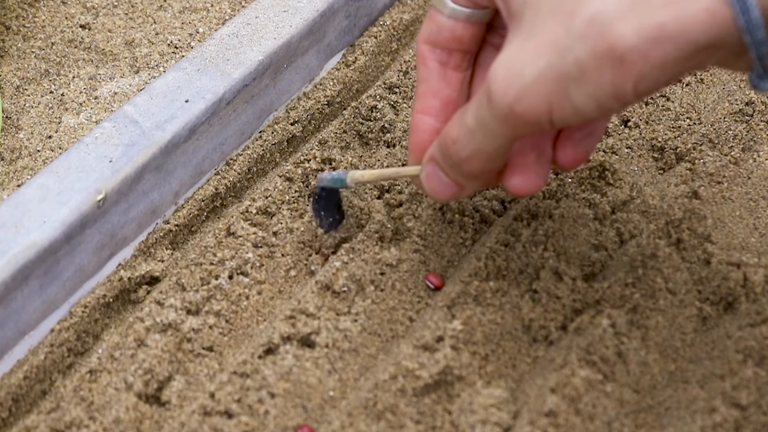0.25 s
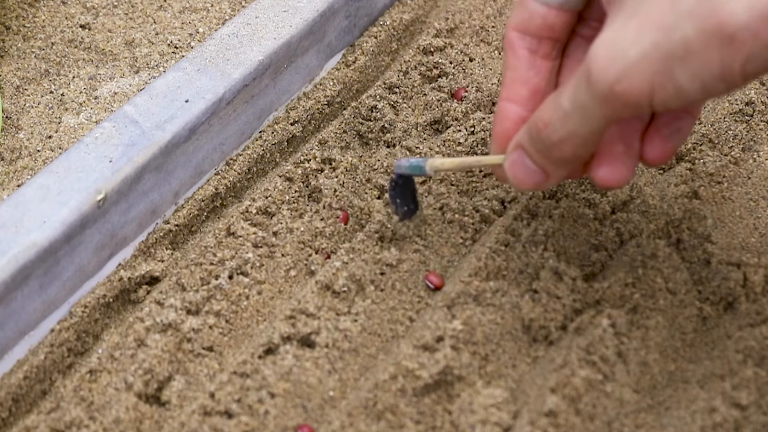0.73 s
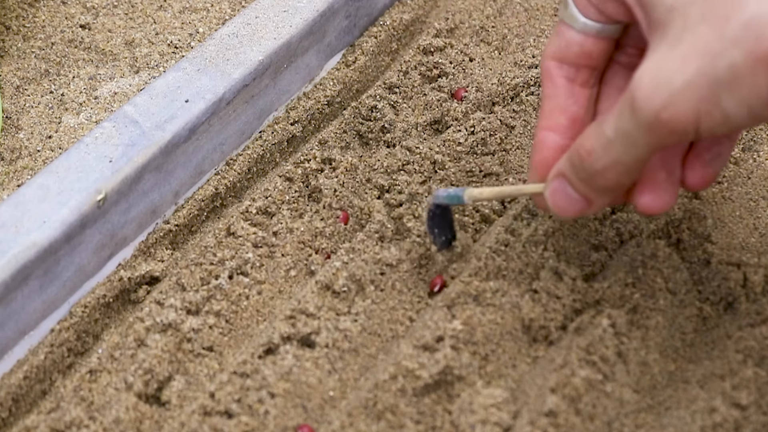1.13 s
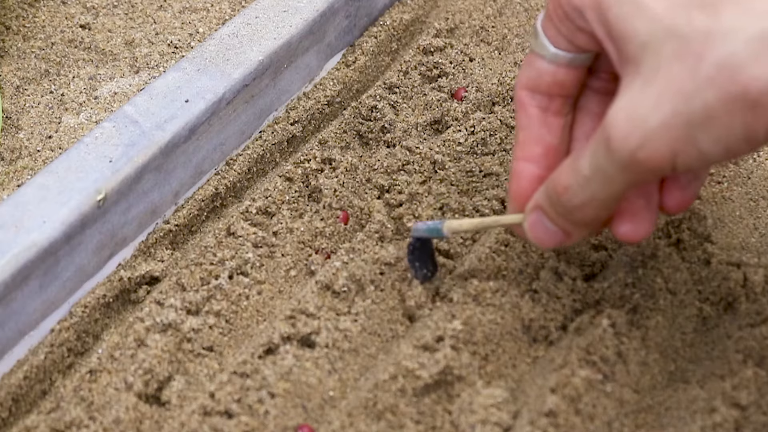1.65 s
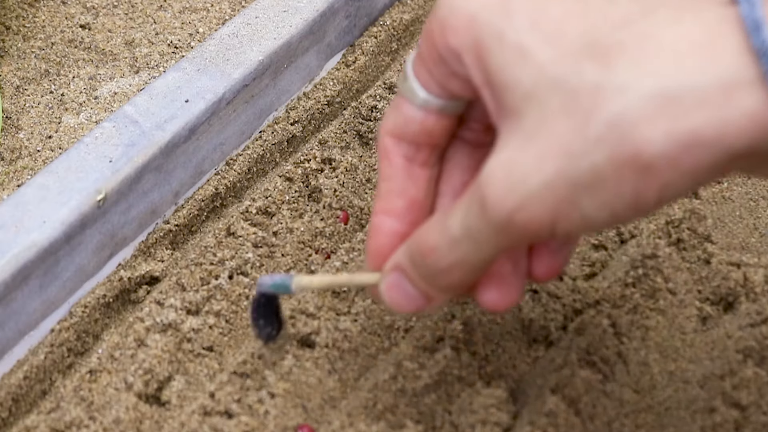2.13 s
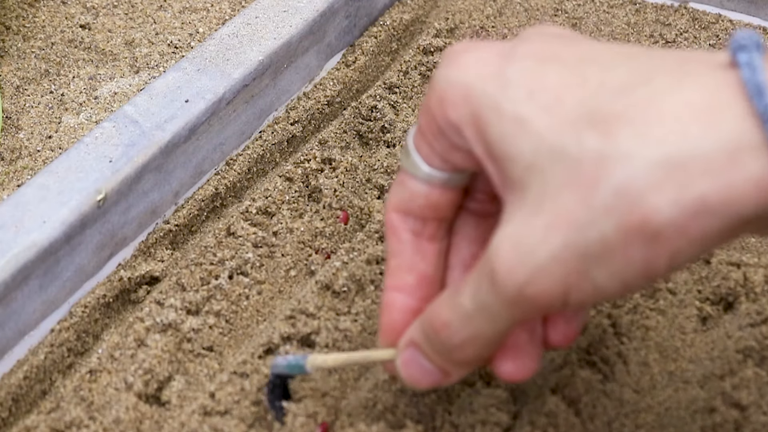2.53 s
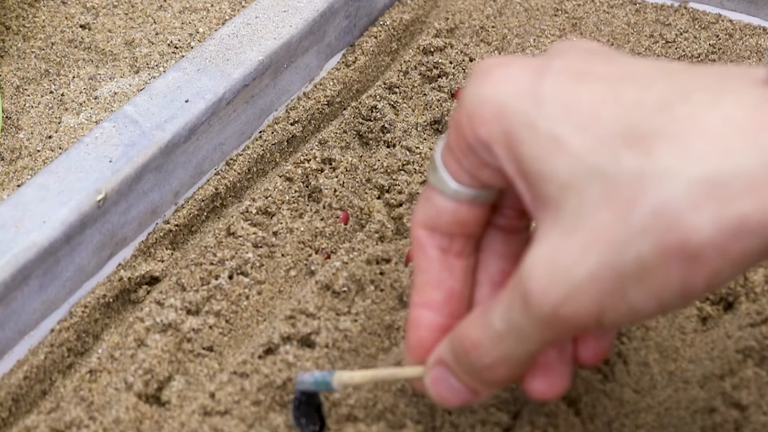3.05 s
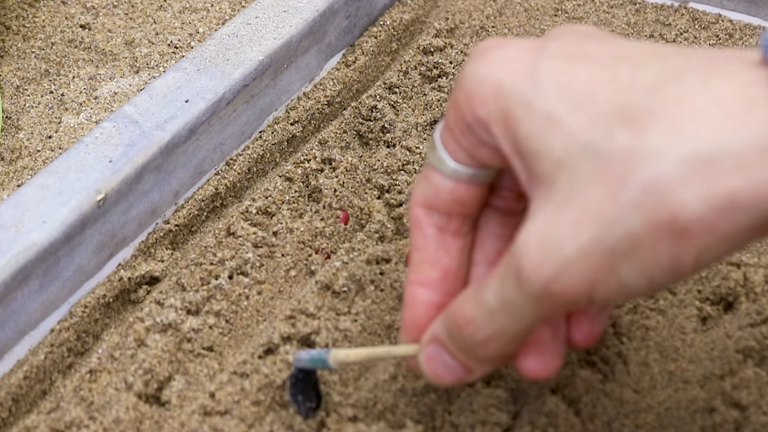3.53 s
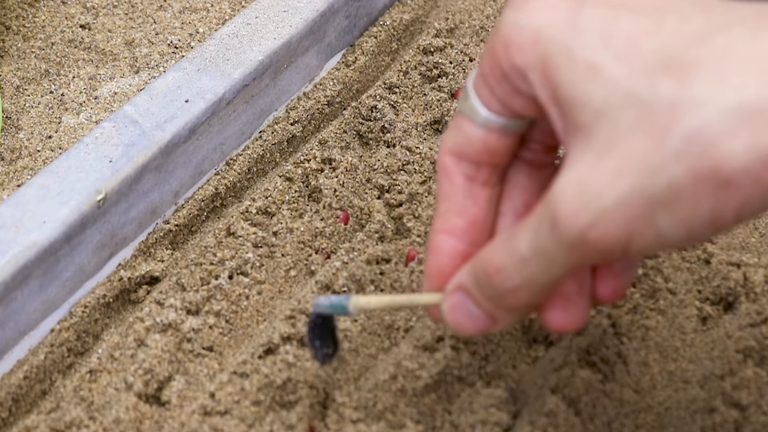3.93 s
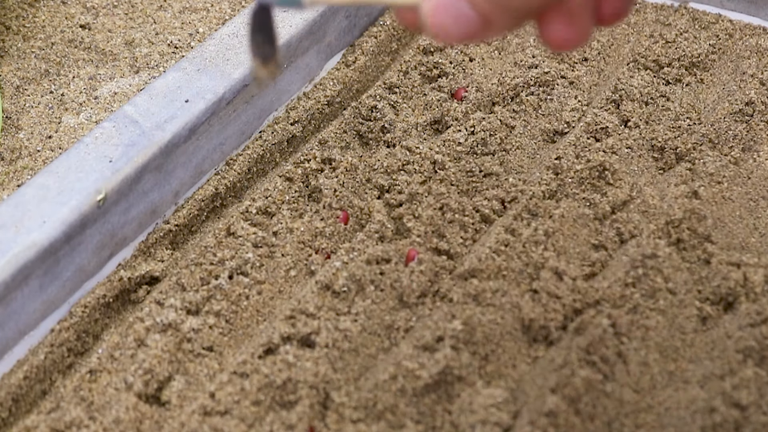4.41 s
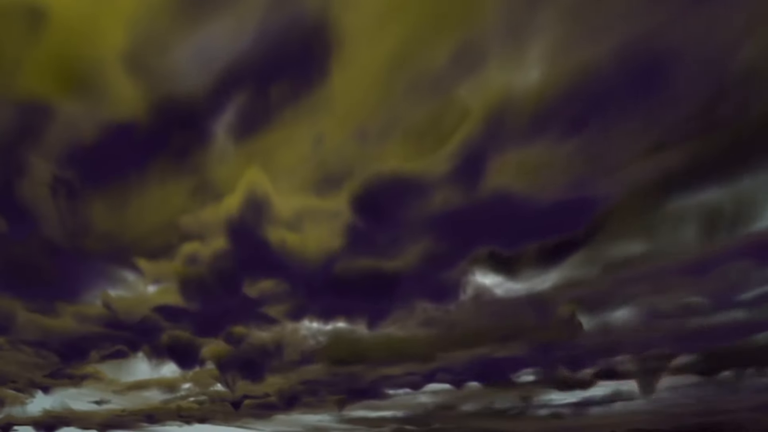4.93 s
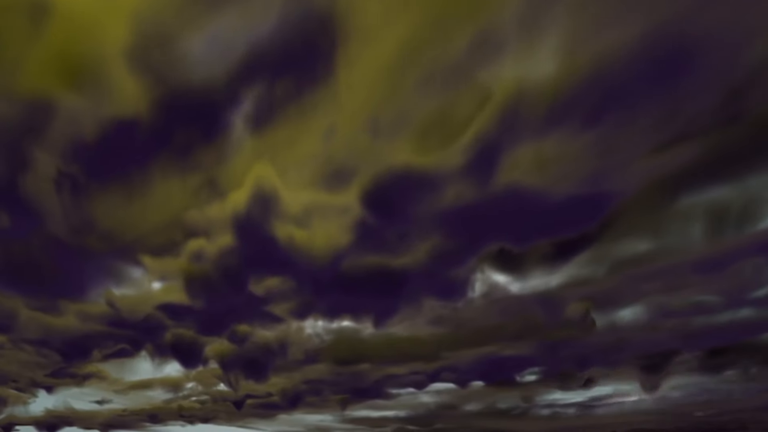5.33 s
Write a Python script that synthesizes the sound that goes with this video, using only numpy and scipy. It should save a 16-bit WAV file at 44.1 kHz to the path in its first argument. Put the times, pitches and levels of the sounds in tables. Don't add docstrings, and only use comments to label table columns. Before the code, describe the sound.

A tiny blade bites and drags through gritty damp sand in six quick strokes while garden birds whistle faintly, then distant thunder rumbles in.

```python
import sys
import numpy as np
from scipy import signal
from scipy.fft import rfft, irfft, next_fast_len
from scipy.io import wavfile
from scipy.ndimage import uniform_filter1d, map_coordinates

SR = 44100
rng = np.random.default_rng(int(sys.argv[2]) if len(sys.argv) > 2 else 0)


def output_pcm(signal):
    pcm = np.clip(np.atleast_2d(signal).T, -1, 1) * 32767
    wavfile.write(sys.argv[1], SR, np.round(pcm).astype(np.int16))


def attenuation_scalar(level_db):
    decades = np.asarray(level_db, float) / 20
    return 10 ** decades


N = 245195
TIME = np.arange(N) / SR

BITES = [.37, 1.255, 1.862, 2.59, 3.121, 3.709]
DEPTHS = [1, -1, 0, -0.5, -0.5, -1.5]
# dig_s, hardest_s, lift_s, rest_s, pressure_db
PULLS = [
    (.41, .545, .6, .7, -24.5),
    (1.32, 1.47, 1.585, 1.665, -27),
    (1.91, 2.045, 2.125, 2.29, -24),
    (2.632, 2.76, 2.835, 2.9, -21.5),
    (3.174, 3.335, 3.405, 3.47, -21.5),
    (3.755, 3.92, 4.04, 4.145, -27),
]
# start_s, spray_db, landing_s, dying_db_per_s
LANDINGS = [
    (0.386, -28, 0.034, 94),
    (.68, -34, 0.0045, 700),
    (1.259, -23.5, 0.0067, 291.5),
    (1.868, -25.5, 0.012, 200.5),
    (2.589, -28.5, 0.015, 500),
    (3.102, -28.5, 0.058, 180),
    (3.714, -26.5, 0.013, 320),
]
SHARE_DB = [0, -3, -1.5, -6.5]
THINS_DB = [1.5, -5, -2, -3]
SPRAY_DB = [-1, -4.5, -7, -13]
DEEPER = [0, -0.26, -.4, 1.3]
BLUNT_DB_PER_S = [0, 2, 20, 147]
NEAR_AIR_DB = [-62.5, -60, -51, -50.5]
FAR_AIR_DB = [-88, -77, -64, -58.5]
# start_s, end_s, air_db
NEAR_SPANS = [
    (.135, .89, 2.5),
    (1.125, 4.297, -.5),
]
# pitch_hz, level_db per Hz
FIZZ = [(7000, -59.5), (8100, -8), (9000, -5), (10900, -2.5), (13000, -4), (15200, -10), (15700, -10),
        (16000, -80.5)]
# pitch_hz, level_db per Hz
HISS = [(3000, -27.5), (4300, -3), (5500, 0), (7000, 1), (7600, 1.5), (8400, -12), (10000, -78)]
# pitch_hz, width_hz, level_db
BLADE = [(2444, 940, -1), (3200, 600, 3.5), (3915, 1000, -1)]
# pitch_hz, width_hz, level_db
HEAP = [(631, 665, -3.5), (1416, 1110, -2.5)]
# pitch_hz, likeness (-1 to 1)
SAND_ALIKE = [(300, 0.71), (1400, 0.94), (3100, .65), (5000, 0.32), (6800, -0.14), (8500, 0.62),
              (11000, 0.78), (15000, 0.015)]
# pitch_hz, left_over_right_db
SAND_PAN = [(380, 8.5), (700, 2), (3500, 2.5), (6500, 5.5), (9000, 1), (13000, 0.5), (15000, 4)]
# centre_s, level_db
TRICKLES = [(.76, -54), (.885, -53), (1.728, -48), (2.298, -49), (2.334, -64), (3, -53), (4.182, -48),
            (4.433, -78)]
# start_s, end_s, level_db
HAZES = [
    (0.097, 0.108, -59.5),
    (3.455, 3.7, -53.5),
    (4.21, 4.389, -57),
]
# start_s, peak_db, pitch_hz, left_over_right_db, fall_by_60_db_s
CHOPS = [
    (0.37, -15, 7250, 3, 0.011),
    (0.6801, -10, 4330, -6, 0.0059),
    (1.2551, -5.5, 4120, -0.5, 0.0062),
    (1.2657, -10, 4550, -3, .014),
    (1.861, -15.5, 3200, -5.5, 0.011),
    (2.589, -17, 3320, -4.5, 0.011),
    (2.633, -19, 2970, -1, 0.014),
    (3.711, -1.5, 4340, -1.5, 0.0041),
    (3.721, -13.5, 4500, 1, 0.015),
]
# start_s, peak_db, pitch_hz, left_over_right_db, fall_by_60_db_s
TICKS = [
    (0.319, -24, 4100, -3, 0.0042),
    (.6523, -18.5, 3670, -12, 0.0052),
    (4.2233, -33, 4560, 6.5, 0.022),
    (4.431, -43.5, 3440, -9, 0.0053),
    (1.558, -28, 766, -0.5, 0.046),
    (4.012, -26.5, 758, 0, 0.044),
]
# start_s, length_s, from_hz, to_hz, level_db
WHISTLES = [(.03, .045, 3550, 2850, -64), (.085, .035, 3200, 3150, -64), (.305, .06, 7700, 7580, -48),
            (.9, .025, 2430, 2390, -56), (.926, .062, 2960, 2540, -51), (.95, .19, 1400, 1385, -58),
            (.02, .15, 1430, 1420, -65), (1.01, .045, 2800, 3320, -54), (1.063, .037, 2250, 1750, -52),
            (1.045, .075, 6300, 7150, -72), (1.222, .03, 2400, 2400, -56), (2.238, .055, 2720, 2540, -49),
            (2.34, .04, 3520, 3400, -50), (2.375, .045, 3120, 3350, -52), (1.67, .03, 3000, 3350, -52),
            (2.48, .03, 3050, 2700, -52), (2.53, .055, 2550, 2900, -51), (2.94, .068, 7900, 5800, -57),
            (3.455, .085, 5900, 5150, -53), (1.72, .022, 2230, 1900, -51), (2.275, .16, 4950, 4750, -60),
            (2.368, .024, 2250, 1980, -52), (3.598, .05, 3630, 4050, -52), (3.533, .022, 5500, 6050, -44)]
# start_s, length_s, ends_hz, dip_hz, level_db
DIPS = [
    (.926, .125, 3050, 2540, -60),
    (2.915, .13, 3900, 3370, -46.5),
]
# time_s into it, pitch_hz
RISE = [(0, 3950), (.022, 4370), (.052, 4780), (.075, 5350), (.09, 5800), (.102, 6950), (.114, 7500),
        (.142, 7680)]
# start_s, level_db
RISES = [
    (3.457, -50),
    (4.267, -42),
]
# pitch_hz, level_db per Hz
ROAD = [(11, -36), (18, -15.5), (48, 1), (124, -6.5), (161, -9), (259, -13.5), (410, -21.5), (523, -29),
        (565, -28.5), (700, -25), (910, -32), (1540, -120)]
# pitch_hz, likeness (-1 to 1)
ROAD_ALIKE = [(40, 0.71), (150, 0.78), (400, 0.5), (1000, 0.32)]
# time_s, level_db
THUNDER = [(4.7, -65.5), (4.74, -49), (4.87, -39.5), (4.91, -36.5), (4.984, -40), (4.997, -24.5),
           (5.075, -30.5), (5.125, -35), (5.36, -29.5), (5.56, -30.5)]
# centre_s, jump_db over the roll
PEALS = [(4.738, 3), (4.849, 6), (4.904, 9.5), (4.942, 11), (5, 0), (5.05, 5.5), (5.163, -16.5), (5.28, -3),
         (5.391, -0.5), (5.44, 3), (5.473, -2.5), (5.508, -3.5)]
# centre_s, peak_db
FLECKS = [
    (5.375, -53),
    (5.509, -52),
]
# pitch_hz, level_db per Hz
ROLL = [(59, -21.5), (100, -11.5), (146, 0), (318, -6), (400, -7), (633, -9.5), (714, -9), (796, -12.5),
        (1290, -20), (2500, -53.5), (3250, -82.5), (5500, -120)]
# pitch_hz, level_db per Hz
BOOM = [(8.8, -39.5), (15, 3.5), (48, 4), (75, 4.5), (113, -12), (140, -5.5), (180, -26.5), (310, -120)]
# pitch_hz, level_db per Hz
CRACKLE = [(1300, -120), (1700, 10), (2600, -9), (3300, -17.5), (4500, -31), (12000, -46.5), (13000, -120)]
# pitch_hz, likeness (-1 to 1)
SKY_ALIKE = [(60, 1), (130, 1), (290, 0.53), (640, 0.56), (1410, 0.47), (2500, 0), (4000, 0)]
# pitch_hz, left_over_right_db
SKY_PAN = [(60, -3.5), (200, -1.5), (400, -6.5), (1300, -6.5), (2400, -2)]


def unit(x):
    return x / np.sqrt(np.mean(x ** 2) + 1e-20)


def along(points, hz):
    f, value = np.transpose(points)
    return np.interp(np.log(hz + 1), np.log(f + 1), value)


def colour(points):
    return lambda hz: attenuation_scalar(along(points, hz))


def wobble(rate):
    knots = rng.standard_normal(int(N * rate / SR) + 4)
    return map_coordinates(knots, [np.arange(N) * rate / SR])


def filtered(x, response):
    m = next_fast_len(N + SR // 2)
    return irfft(rfft(x, m) * response(np.fft.rfftfreq(m, 1 / SR)), m)[..., :N]


def resonances(modes, hz):
    total = 0
    for k, (centre, width, db) in enumerate(modes):
        damping = 1j * hz * width
        total = total + (-1) ** k * attenuation_scalar(db) * damping / (centre ** 2 - hz ** 2 + damping)
    return total


def spread(pair, gain, alike, pan):
    m = next_fast_len(N + 8192)
    hz = np.fft.rfftfreq(m, 1 / SR)
    turn = np.arccos(np.clip(along(alike, hz), -1, 1)) / 2
    mid, side = rfft(pair, m) * gain(hz) * [np.cos(turn), np.sin(turn)]
    lean = attenuation_scalar(along(pan, hz) / 2 * [[1], [-1]])
    both = irfft(np.array([mid + side, mid - side]) * lean, m)[:, :N]
    return both / np.sqrt(np.mean(both.mean(0) ** 2))


def grit(clumps, spike_db):
    sizes = attenuation_scalar(spike_db * rng.exponential(1, (2, N)))
    return clumps * sizes * rng.standard_normal((2, N))


def puffs(events, width_s):
    return sum(attenuation_scalar(db - 10 * ((TIME - s) / width_s) ** 2) for s, db in events)


def drag():
    fizz_db, hiss_db, blade_db, heap_db = drag_levels()
    clumps = attenuation_scalar(1.5 * wobble(40) + 0.62 * wobble(350))

    def sand(gain, spike_db, depth_db):
        return spread(patchy(grit(clumps, spike_db), depth_db), gain, SAND_ALIKE, SAND_PAN)

    def blade_gain(hz):
        return resonances(BLADE, hz) * hz ** 2 / (hz ** 2 + 1600 ** 2) / (1 + (hz / 5000) ** 4)

    def heap_gain(hz):
        return resonances(HEAP, hz) * hz ** 2 / (hz ** 2 + 400 ** 2) / (1 + (hz / 2200) ** 4)

    fizz = sand(colour(FIZZ), spike_db=2.0, depth_db=2.5)
    hiss = sand(colour(HISS), spike_db=2.0, depth_db=2.0)
    blade = sand(blade_gain, spike_db=2.5, depth_db=1.5)
    heap = sand(heap_gain, spike_db=2.5, depth_db=2.0)

    since_s = TIME - np.array([0, *BITES])[np.searchsorted(BITES, TIME)]
    blade_buried = np.clip(since_s / 0.082 - 1, -1, 1) * (since_s < .32)
    heap_buried = np.clip(since_s / 0.1013 - 1, -1, 1)
    blade = sinking(blade, 2450, blade_buried, tilt_db=3.0)
    heap = sinking(heap, 550, heap_buried, tilt_db=2.0)

    far = 1 / (1 + attenuation_scalar(fizz_db + 45.5))
    layers = (attenuation_scalar(fizz_db) + puffs(TRICKLES, width_s=0.012)) * fizz
    layers = layers + attenuation_scalar(hiss_db) * widened(hiss, far)
    layers = layers + attenuation_scalar(blade_db) * widened(blade, far)
    return layers + attenuation_scalar(heap_db) * widened(heap, far)


def drag_levels():
    pull, spray, skim = contact()
    present = uniform_filter1d(sum(1. * (TIME > a) * (TIME < b) for a, b, _ in NEAR_SPANS), size=300)
    stir_db = sum(db * (TIME > a) * (TIME < b) for a, b, db in NEAR_SPANS)
    depth_db = np.array([0, *DEPTHS])[np.searchsorted(BITES, TIME + .05)]
    air = [attenuation_scalar(far + (near - far) * present + stir_db + fade_db()) ** 2
           for near, far in zip(NEAR_AIR_DB, FAR_AIR_DB)]
    for start, end, db in HAZES:
        air[1] = air[1] + (TIME > start) * attenuation_scalar(db - 86 * np.maximum(TIME - end, 0)) ** 2
    levels = []
    for share, thins, thrown, deeper, still in zip(SHARE_DB, THINS_DB, spray, DEEPER, air):
        moved = pull * attenuation_scalar(share + thins * skim) ** 2 + thrown
        power = present * attenuation_scalar(deeper * depth_db) ** 2 * moved + still
        levels.append(10 * np.log10(power + 1e-20))
    return levels


def contact():
    dig_in_s, settle_db_per_s = 0.024, 74.5
    pull, spray, skim = np.zeros(N), np.zeros((len(SPRAY_DB), N)), np.zeros(N)
    for dig, hardest, lift, rest, db in PULLS:
        shape_db = np.interp(TIME, [dig - dig_in_s, dig, hardest, lift, rest], [-22, -6, 0, -5.5, -26])
        settling_db = settle_db_per_s * np.maximum(TIME - rest, 0)
        pull += (TIME > dig - dig_in_s) * attenuation_scalar(db + shape_db - settling_db) ** 2
        skim += np.interp(TIME, [dig, hardest, lift, rest], [0, 0.65, 0.89, 0.045])
    for s, db, landing, dying in LANDINGS:
        mix = attenuation_scalar(np.array(SPRAY_DB) + np.array(BLUNT_DB_PER_S) * landing)
        drop_db = np.where(TIME < s, 20 * (s - TIME) / landing, dying * (TIME - s))
        spray += np.outer(mix ** 2, attenuation_scalar(db - drop_db) ** 2)
    return pull, spray, skim


def patchy(pair, depth_db):
    z = signal.stft(pair, nperseg=512)[2]
    field = uniform_filter1d(rng.standard_normal(z.shape[1:]), size=3, axis=0)
    field = uniform_filter1d(field, size=10, axis=1)
    return signal.istft(z * attenuation_scalar(depth_db * unit(field)), nperseg=512)[1][:, :N]


def sinking(x, split_hz, buried, tilt_db):
    low = filtered(x, lambda hz: 1 / (1 + (hz / split_hz) ** 10))
    return attenuation_scalar(tilt_db * buried) * low + attenuation_scalar(-tilt_db * buried) * (x - low)


def widened(pair, far):
    left, right = pair
    return np.array([left * attenuation_scalar(-1.2 * far), np.cos(far) * right + np.sin(far) * np.roll(right, SR)])


def chops():
    out, t = np.zeros((2, N + SR)), np.arange(SR // 40) / SR
    hits = [(*row, .45) for row in CHOPS] + [(*row, .82) for row in TICKS]
    for s, db, hz, pan_db, t60, share in hits:
        burst = attenuation_scalar(-120 * t / t60) + 0.23 * attenuation_scalar(-60 * t / .05)
        mid, side = np.diff(rng.standard_normal((2, len(t) + 1))) * burst
        crack = np.array([mid + .5 * side, mid - .5 * side])
        ping = np.sin(2 * np.pi * hz * t) * attenuation_scalar(-60 * t / t60) * (1 - np.exp(-t / 0.00013))
        hit = 0.55 * (1 - share) * crack + 1.13 * share * ping
        out[:, round(s * SR):][:, :len(t)] += attenuation_scalar(db) * attenuation_scalar([[pan_db / 2], [-pan_db / 2]]) * hit
    return out[:, :N]


def birds():
    song = np.zeros((2, N))
    waver_hz, flutter_db = 12 * wobble(330), 1.2 * wobble(200) + 1.08 * wobble(45)
    for s, hz, db in whistle_paths():
        span = slice(round(s * SR), round(s * SR) + len(hz))
        hz = uniform_filter1d(hz, size=400, mode="nearest") + waver_hz[span]
        swell = attenuation_scalar(db + flutter_db[span]) * signal.windows.tukey(len(hz), .4)
        tone = np.sqrt(2) * swell * np.sin(2 * np.pi * np.cumsum(hz) / SR)
        song[:, span] += tone * attenuation_scalar(rng.normal(0, 3.0) * np.array([[1], [-1]]))
    t = np.arange(SR // 2) / SR
    tail = rng.standard_normal((2, len(t))) * attenuation_scalar(-60 * t / 0.67)
    echo = signal.fftconvolve(song, tail / np.linalg.norm(tail[0]), axes=1)[:, :N]
    return song + attenuation_scalar(-8 - 60 * np.maximum(TIME - 4.4, 0)) * echo


def whistle_paths():
    def run(length):
        return np.linspace(0, 1, round(length * SR))

    paths = []
    for s, length, start_hz, end_hz, db in WHISTLES:
        paths.append((s, end_hz + (start_hz - end_hz) * (1 - run(length)) ** 1.4, db))
    for s, length, ends, dip, db in DIPS:
        bend_hz = dip + (ends - dip) * (2 * run(length) - 1) ** 2
        paths.append((s, bend_hz, db - 8 * (1 - run(length)) ** 2))
    climbing = run(RISE[-1][0])
    climb_hz = np.interp(climbing * RISE[-1][0], *np.transpose(RISE))
    for s, db in RISES:
        paths.append((s, climb_hz, db - 3.5 * climbing))
    return paths


def traffic():
    hum = spread(rng.standard_normal((2, N)), colour(ROAD), ROAD_ALIKE, [(50, -0.67)])
    return attenuation_scalar(-38 + fade_db() + 1.6 * wobble(12)) * hum


def fade_db():
    return -29.5 * np.maximum(TIME - 4.15, 0) - 3000 * np.maximum(TIME - 4.74, 0)


def thunder():
    roll_db = np.interp(TIME, *np.transpose(THUNDER))
    boom_db = 0.5 + np.interp(TIME - .04, TIME, roll_db) - roll_db
    crackle_db = -26.5 - 57 * np.maximum(5.4 - TIME, 0)
    claps = sum((TIME > s) * attenuation_scalar(jump_db - 60 * np.abs(TIME - s) / 0.086) for s, jump_db in PEALS)
    lumps = attenuation_scalar(0.77 * wobble(60)) + uniform_filter1d(claps, size=150)
    lumps = lumps / np.sqrt(uniform_filter1d(lumps ** 2, size=5000))
    sharp = lumps ** 1.7 * attenuation_scalar(3.4 * wobble(70))
    roll = spread(grit(lumps, spike_db=2), colour(ROLL), SKY_ALIKE, SKY_PAN)
    boom = spread(rng.standard_normal((2, N)), colour(BOOM), SKY_ALIKE, SKY_PAN)
    crackle = spread(grit(sharp, spike_db=1.5), colour(CRACKLE), SKY_ALIKE, SKY_PAN)
    layers = attenuation_scalar(0.6) * roll + attenuation_scalar(boom_db) * boom + attenuation_scalar(crackle_db) * crackle
    flecks = puffs(FLECKS, width_s=0.0034) * np.sin(2 * np.pi * 2600 * TIME)
    left, right = attenuation_scalar(roll_db) * (TIME > THUNDER[0][0]) * layers + flecks
    return np.array([np.roll(left, shift=15), right])


def scene():
    return drag() + chops() + birds() + traffic() + thunder()


def roll_off(x):
    return signal.sosfilt(signal.butter(12, 16650, fs=SR, output="sos"), x)


def record(dry):
    soft_top = filtered(dry, lambda hz: 1 / (1 + (hz / 15900) ** 60))
    hz, s, z = signal.stft(soft_top, SR, nperseg=1024)
    power = uniform_filter1d(np.abs(z.mean(0)) ** 2, size=3, axis=0)
    power = uniform_filter1d(power, size=5, axis=1)
    near_db = 10 * np.log10(np.abs(power) + 1e-20)
    around_db = uniform_filter1d(near_db, size=21, axis=0)
    faint = near_db < around_db - np.where(around_db < -82, .8, 4.5)
    dropped = faint & (hz[:, None] > 1500) & (s < THUNDER[0][0])
    kept = signal.istft(z * np.where(dropped, .15, 1), SR, nperseg=1024)[1][:, :N]
    self_noise = attenuation_scalar(-83) * filtered(rng.standard_normal((2, N)), lambda hz: hz < 12000)
    return roll_off(kept + self_noise)


dry = scene()
out = record(dry)
output_pcm(out)
```